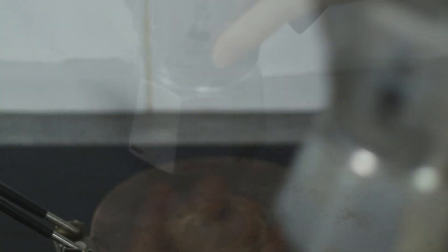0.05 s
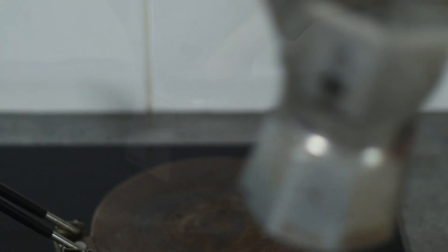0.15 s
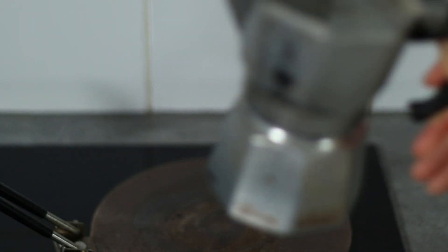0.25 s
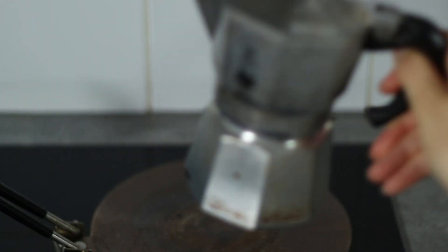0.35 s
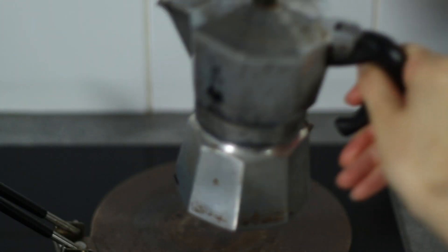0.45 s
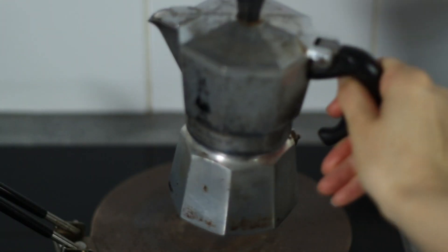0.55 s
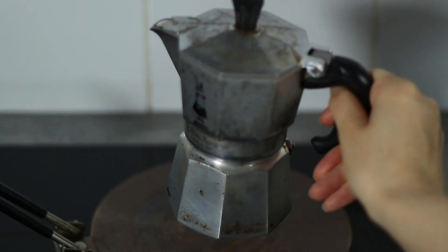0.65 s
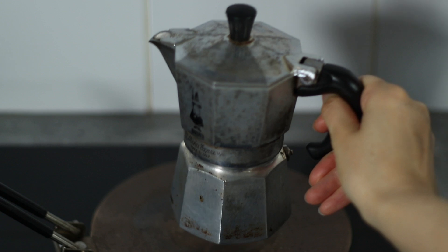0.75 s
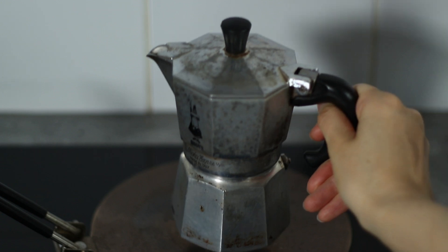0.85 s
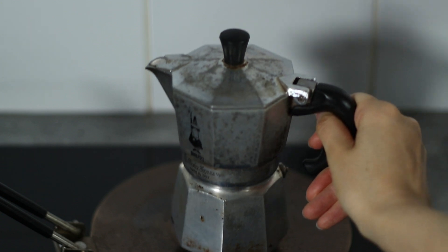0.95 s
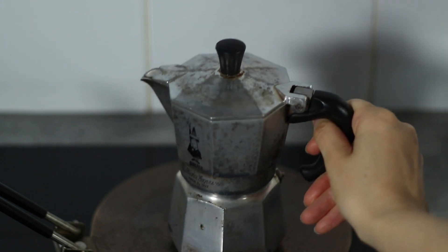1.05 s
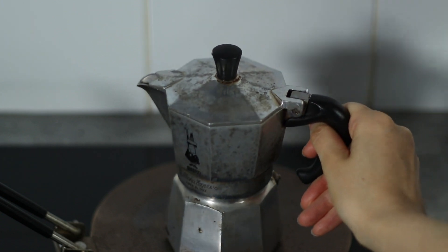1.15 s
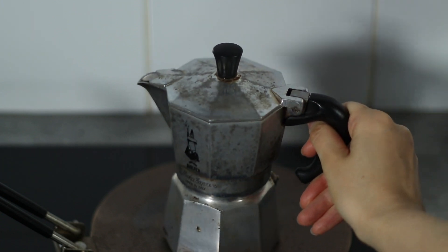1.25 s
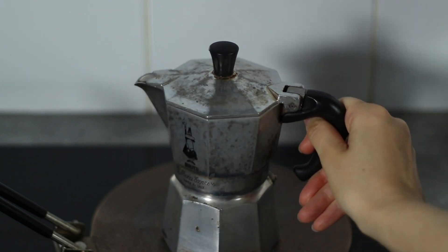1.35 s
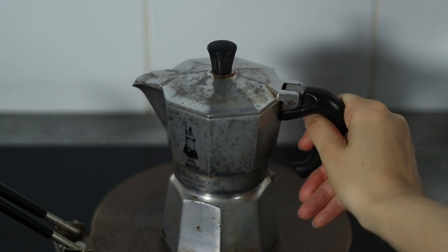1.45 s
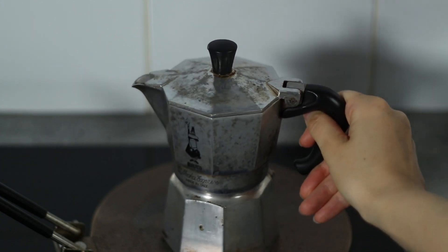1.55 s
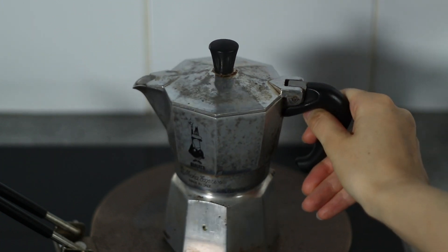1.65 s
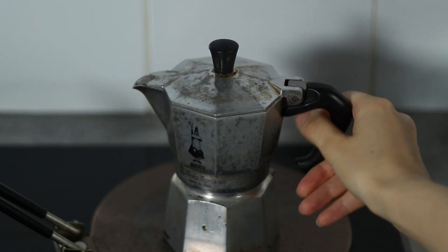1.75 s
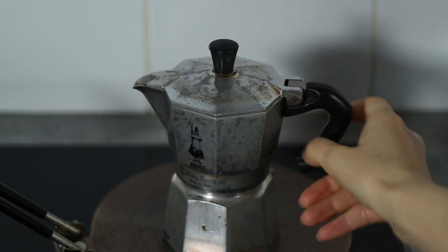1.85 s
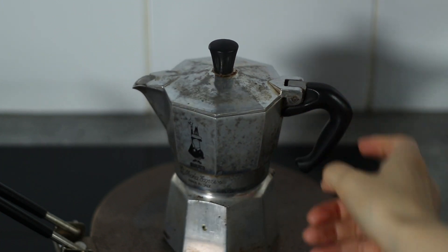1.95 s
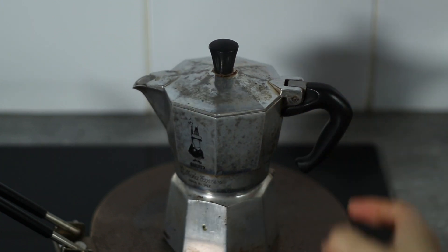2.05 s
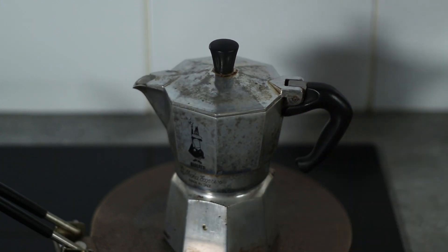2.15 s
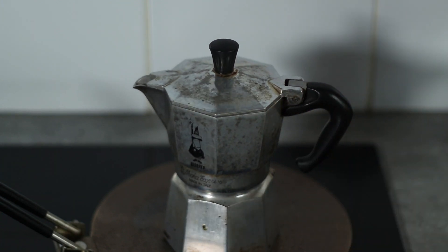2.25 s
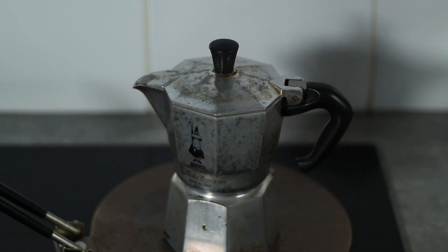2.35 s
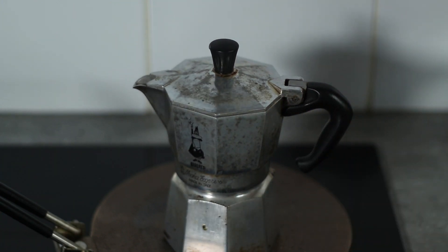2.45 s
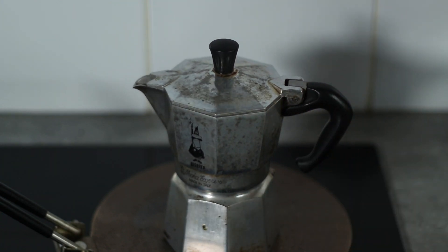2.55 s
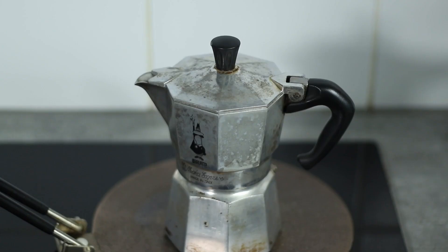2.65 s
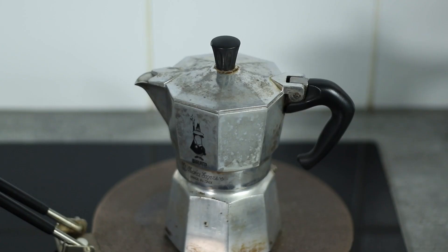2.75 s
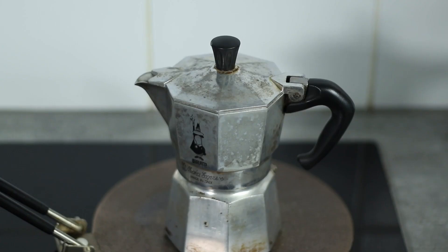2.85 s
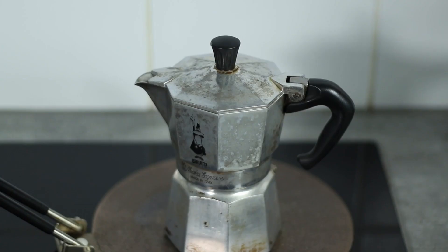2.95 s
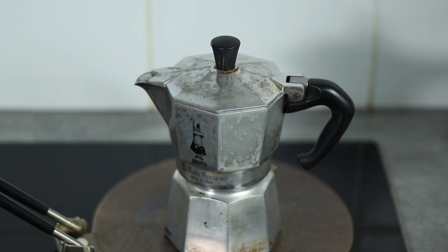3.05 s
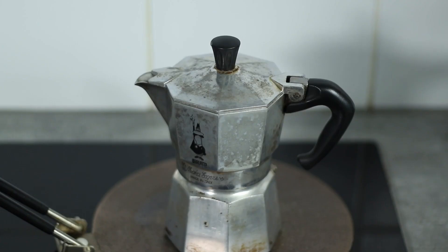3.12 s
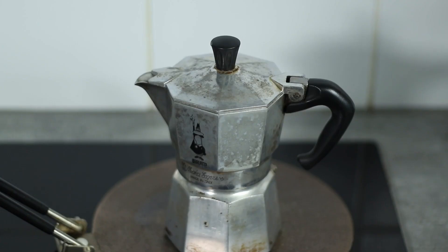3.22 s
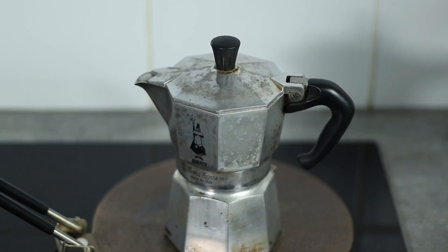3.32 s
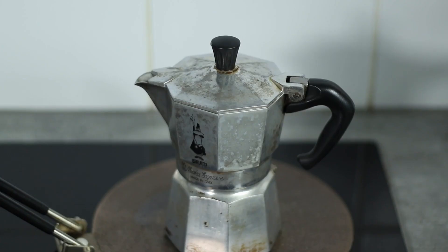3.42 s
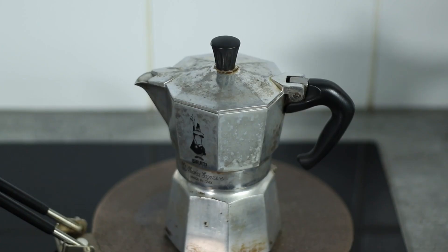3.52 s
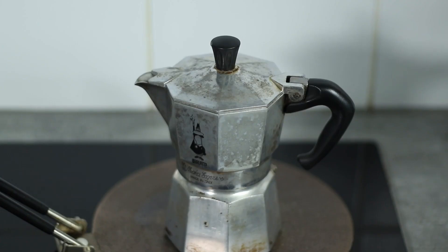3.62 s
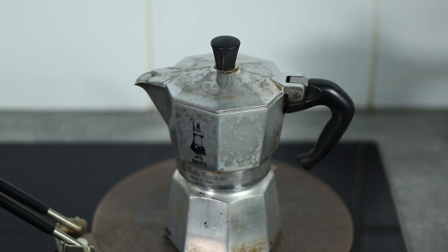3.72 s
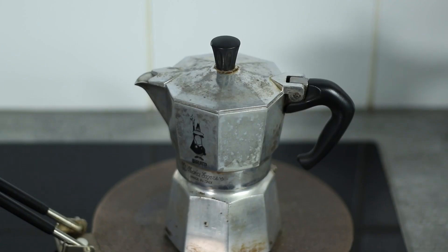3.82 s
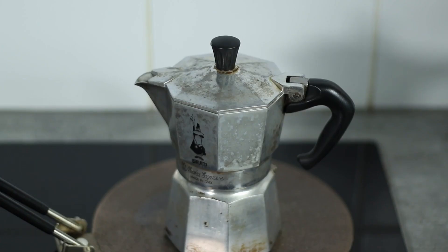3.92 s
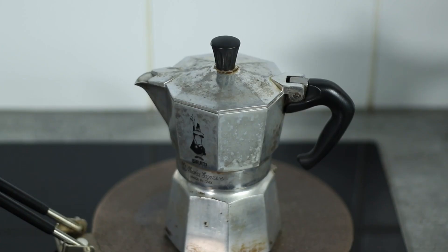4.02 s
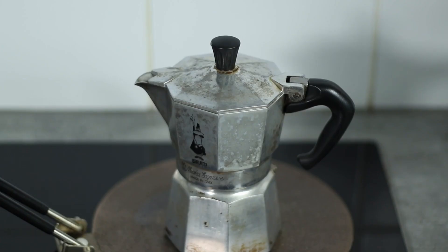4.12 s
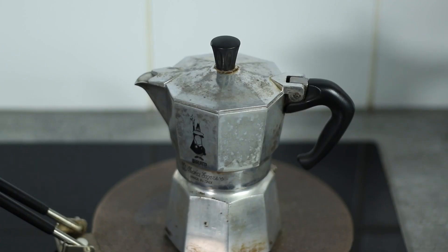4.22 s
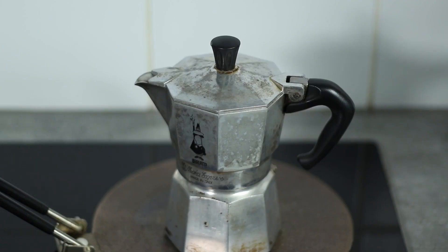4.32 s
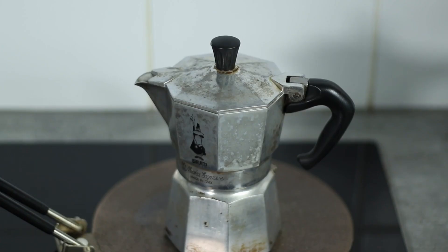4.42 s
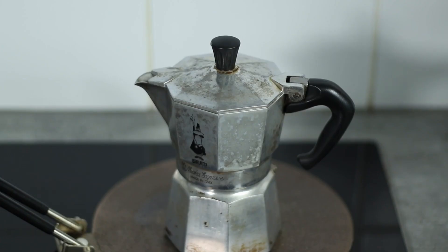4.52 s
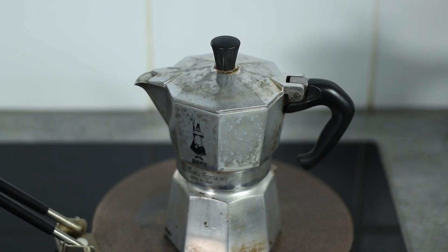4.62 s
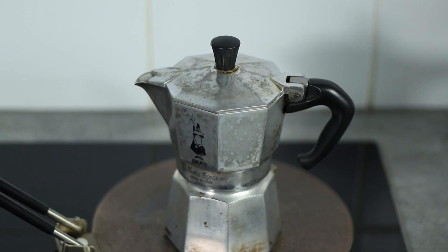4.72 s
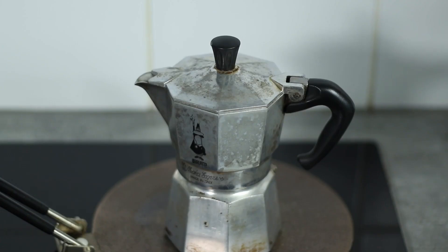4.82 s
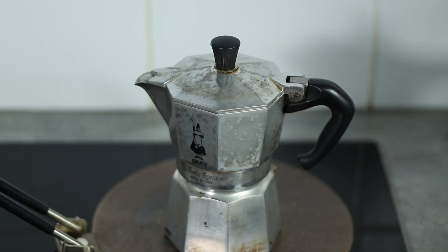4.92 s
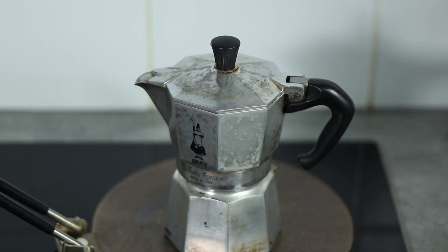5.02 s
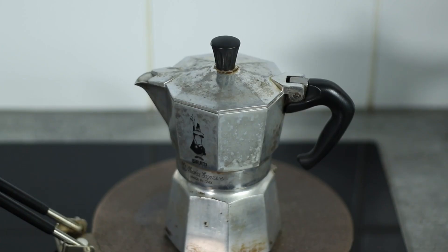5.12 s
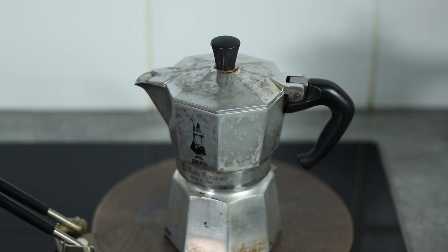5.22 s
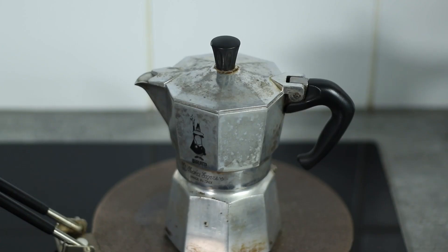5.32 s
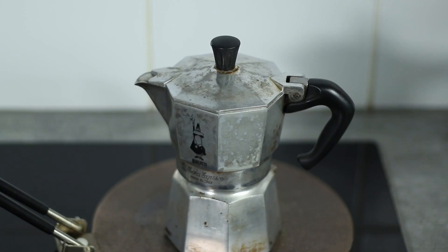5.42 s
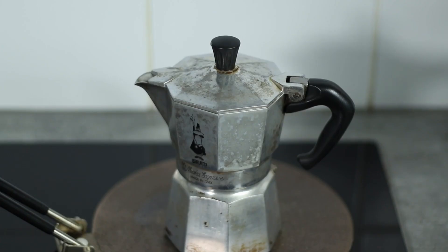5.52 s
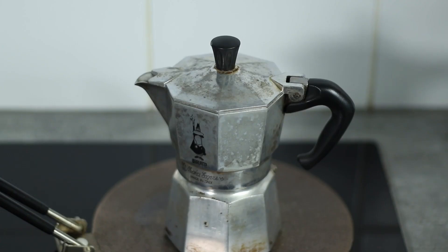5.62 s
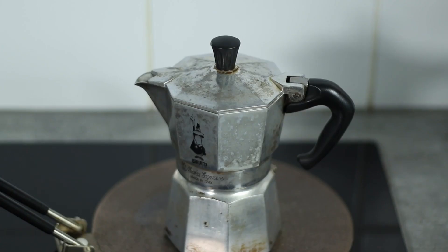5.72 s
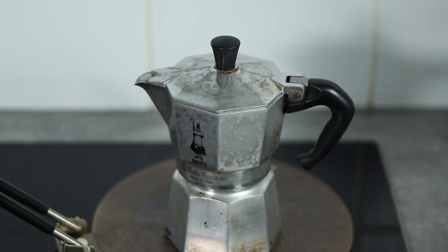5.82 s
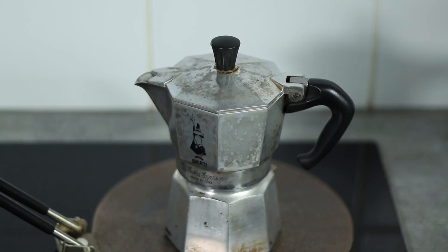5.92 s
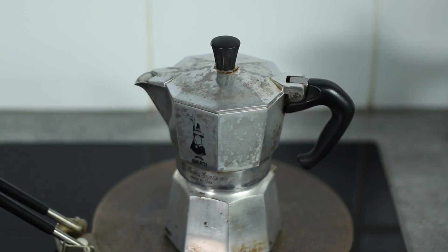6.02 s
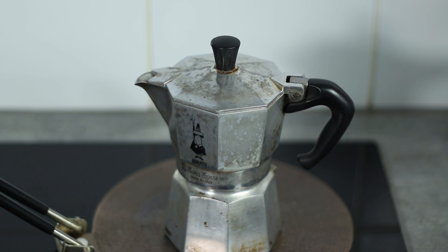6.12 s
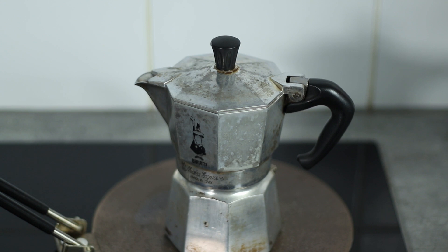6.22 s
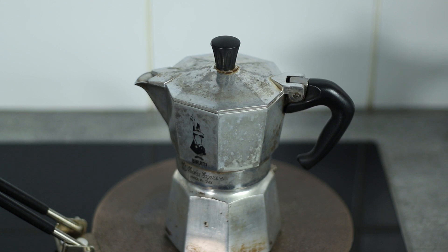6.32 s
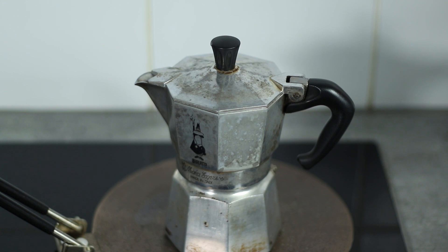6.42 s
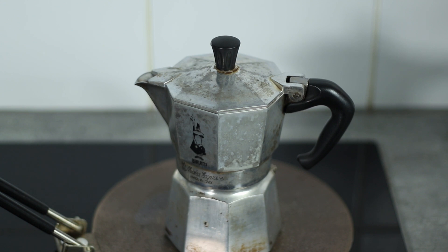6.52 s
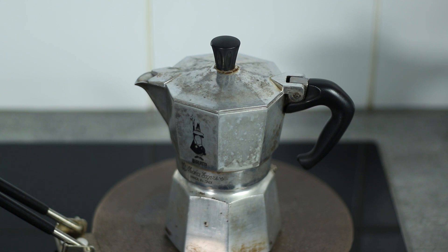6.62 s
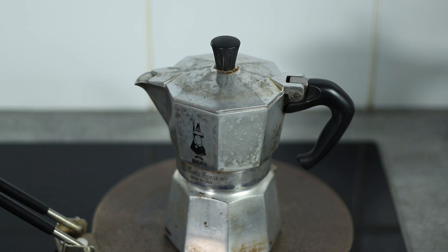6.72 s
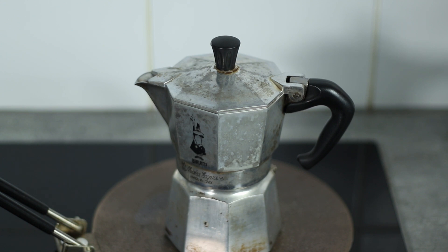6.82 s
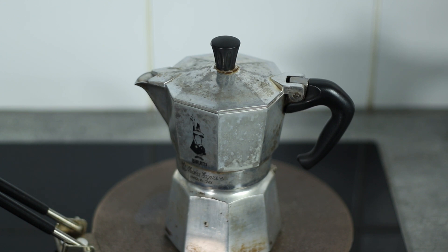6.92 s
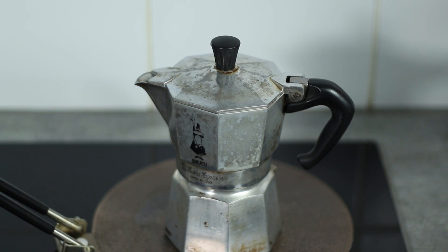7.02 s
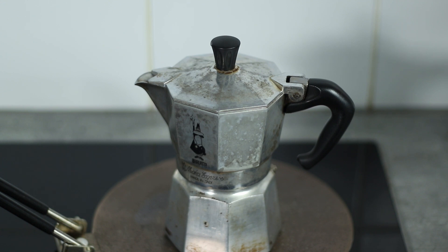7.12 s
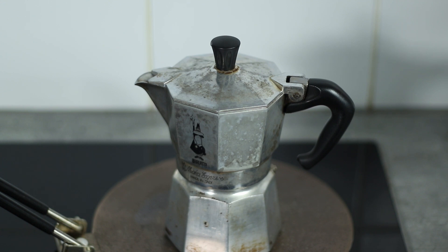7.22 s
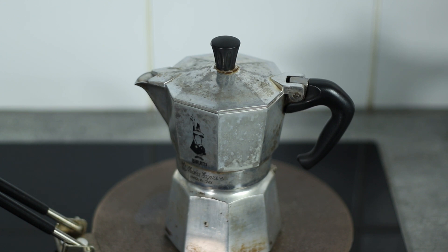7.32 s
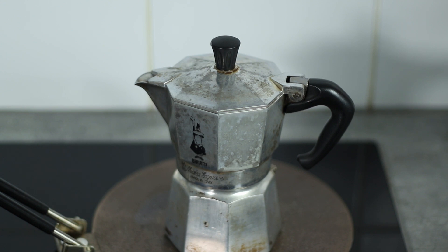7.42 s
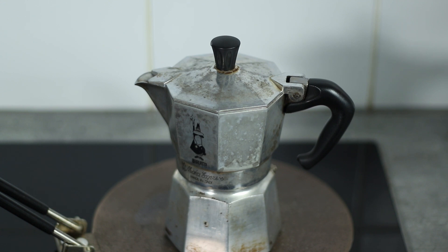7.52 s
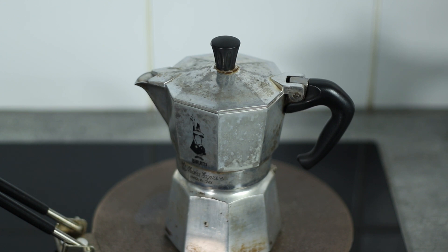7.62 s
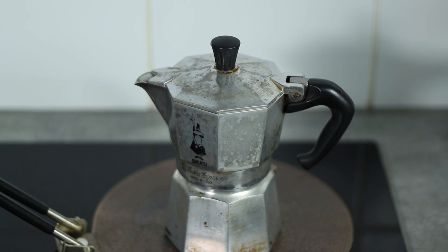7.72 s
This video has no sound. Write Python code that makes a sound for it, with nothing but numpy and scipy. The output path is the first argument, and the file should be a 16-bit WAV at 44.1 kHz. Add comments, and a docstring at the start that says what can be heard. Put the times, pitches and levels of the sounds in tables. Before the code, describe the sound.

A metal pot clanks down onto a steel plate in a quiet kitchen, then an abrupt cut to sizzling, spitting water, relay clicks, hum and fan.

```python
"""Coffee pot on a glass hob

In a quiet kitchen a metal pot lands on a steel plate over a glass hob, rocks and slides: ringing modes, thumps
and gritty noise. After a cut the hob runs. Trapped water sizzles, spits and whistles, made of hiss, noise bursts
and noise-widened tones. Relays click as ringing modes with noise, the coil hums on two sines,
and the fan whirs with shaft tones over air noise.
"""
import sys
import numpy as np
from scipy import signal
from scipy.fft import rfft, irfft, next_fast_len
from scipy.io import wavfile
from scipy.ndimage import uniform_filter1d, map_coordinates

SR = 44100
rng = np.random.default_rng(int(sys.argv[2]) if len(sys.argv) > 2 else 0)


def to_wav(s):
    """Save 16-bit WAV."""
    ch = np.atleast_2d(s).T  # columns
    pcm = np.round(np.clip(ch, -1, 1) * 32767)  # PCM
    wavfile.write(sys.argv[1], SR, pcm.astype(np.int16))


N = 342216
T = np.arange(N) / SR  # seconds

# Levels and spectra below are relative: each source sets its own gain.
# Contacts of pot and plate. Each row: start in seconds, metal level in dB, thump level in dB.
BLOWS = [(1.2663, -8.5, -9), (1.3, -36, -27), (1.456, -31.5, -18.5), (1.480, -68, -18.5), (1.535, -59, -32),
         (1.611, -70, -37.5), (1.824, -59, -34), (1.844, -70, -32.5), (1.869, -80, -38.5)]
# Ringing modes of pot and plate. Each row: frequency in Hz, level in dB, t60 in seconds.
POT_MODES = [(626, -8.5, 0.18), (734, -7, 0.28), (820, -7.5, 0.11), (1150, -7, 0.05), (1212, -8.5, 0.26),
             (1377, -17, 0.53), (1567, -2, 0.099), (1707, -18, 0.321), (2047, -5.5, 0.046),
             (2300, -13.5, 0.19), (2720, -13, 0.33), (2740, -13.5, 0.17), (3040, -17, 0.093),
             (3176, -22.5, 0.31), (3580, -21.5, 0.2), (3865, -18.5, 0.244), (3750, -20, 0.17),
             (4440, -14.5, 0.1), (4409, -13.5, 0.04), (5060, -25.5, 0.2), (9534, -45.5, 0.25)]
# Modes of the worktop below. Each row: frequency in Hz, level in dB, t60 in seconds.
WORKTOP_MODES = [(61.2, -4, 0.25), (110, 8.5, 0.055), (131, 0, 0.27), (170, 4, 0.1), (227.7, -8, 0.053),
                 (292, -12, .12), (364, -7, 0.12), (469, -17.5, 0.21), (682, -12, .1)]
# Broad clatter of the plate. Each row: frequency in Hz, density in dB per Hz.
CLANK_SPECTRUM = [(180, -32.5), (300, -8), (377, -3.5), (467, -15.5), (788, -7), (1820, -20.5),
                  (2730, -8.5), (3270, -30.5), (4120, -14.5), (5180, -33.5), (5710, -29.5), (15000, -71)]
# The pot sliding. Each row: time in seconds, level in dB.
SLIDE = [(1.457, -59), (1.58, -63), (1.7, -61), (1.745, -69)]
# Colour of the sliding. Each row: frequency in Hz, density in dB per Hz.
RUBBING_SPECTRUM = [(200, -24), (400, 2.5), (1000, -11), (2500, -13), (3300, -14.5), (4200, -12.5),
                    (4900, -20.5), (5300, -24), (5900, -26), (6600, -26), (7600, -26), (8300, -29),
                    (8900, -34.5), (12000, -46)]
# A sleeve rustling. Each row: time in seconds, level in dB.
RUSTLE = [(2.38, -87), (2.436, -75), (2.64, -83.5), (2.66, -96)]
# Colour of the sleeve. Each row: frequency in Hz, density in dB per Hz.
CLOTH_SPECTRUM = [(1500, -30), (4000, 2), (8000, 3), (15000, -10.5)]
# Ticks of the handle. Each row: start in seconds, level in dB, centre in Hz.
HANDLE_TICKS = [(0.9898, -45.5, 4450), (2.031, -42.5, 5800)]
# Sizzle under the pot. Each row: time in seconds, level in dB, crackle share in dB, top hiss level in dB.
SIZZLE = [(2.69, -37, -1, -63), (2.85, -49.5, 5.5, -59), (3.5, -53, 5.5, -60), (3.8, -56, -6, -59.5),
          (3.96, -62.5, -3, -65), (4.01, -79, 6, -78), (4.1, -65.5, 6.5, -69), (4.2, -85, 13, -71.5),
          (4.75, -65.5, -2, -68.5), (5.4, -55.5, -12, -57.5), (5.87, -59, -17, -57), (5.92, -52, -2, -53),
          (7.45, -51, -0.5, -53), (7.53, -64.5, 2, -63.5), (7.63, -64, 6.5, -60), (7.69, -53, 0, -54.5),
          (7.76, -58.5, -4, -67)]
# Main body of the steam hiss. Each row: frequency in Hz, density in dB per Hz.
STEAM_SPECTRUM = [(240, -39), (400, 3.5), (512, 0), (626, 1.5), (742, -1.5), (906, -8), (1330, -3),
                  (1900, -10), (2050, -7.5), (4180, -4.5), (7400, -1.5), (15000, -20.5), (16000, -15)]
# Tiny crackling bursts. Each row: frequency in Hz, density in dB per Hz.
CRACKLE_SPECTRUM = [(1000, -52), (2500, -5), (4500, -11), (6800, 2), (8500, -0.5), (11000, -22),
                    (16000, -20)]
# Fine top of the hiss. Each row: frequency in Hz, density in dB per Hz.
JET_SPECTRUM = [(5590, -19), (9500, 0), (11100, -1.5), (12400, -3.5), (15000, 2.5), (15700, -4),
                (16000, -13)]
# Drops bursting at set times, most of them loud. Each row: start in seconds, level in dB,
# low body relative to the snap in dB.
SET_SPITS = [(2.6959, -12.5, -6.5), (2.7152, -24.5, 7), (2.7245, -14.5, -5), (2.7377, -19, -5),
             (2.7731, -19, -20), (2.7892, -16.5, -8), (2.798, -21, -20), (2.851, -23, -4),
             (2.8899, -21, -8), (2.9038, -30, -18), (2.9234, -14, 0), (2.9487, -14.5, -15),
             (2.9961, -14, -4.5), (3.029, -16, -7), (3.0371, -13, -15), (3.0788, -27, 6),
             (3.1113, -25, -13), (3.1504, -10.5, -10), (3.1573, -16.5, -7.5), (3.2246, -23, -18),
             (3.254, -14, -12.5), (3.2733, -19, -22), (3.3113, -13.5, -10), (3.3474, -17.5, -13),
             (3.4245, -15.5, -8.5), (3.473, -26, -21), (3.5783, -13.5, -3.5), (6.0547, -21, -7),
             (6.5195, -25, -20)]
# Separate puffs of escaping steam. Each row: time in seconds, level in dB.
PUTTER = [(3.9, -70), (3.96, -55), (4.02, -65.5), (4.9, -65.5), (5.4, -73.5), (7.45, -76), (7.52, -61),
          (7.76, -62.5)]
# Colour of the puffs. Each row: frequency in Hz, density in dB per Hz.
PUFF_SPECTRUM = [(3000, -33), (5000, -19), (9000, -8), (12000, -5), (15000, -1)]
# Bands of the steam whistle. Each row: pitch ratio, level in dB.
WHISTLE_BANDS = [(1, 0), (.88, -3), (.6, -7), (1.13, -9)]
# Plate resonances that colour hiss and scraping. Each row: frequency in Hz, width in Hz, lift in dB.
PLATE_PEAKS = [(4800, 400, 4), (5950, 400, 4), (7600, 400, 2), (8800, 450, 4), (10050, 400, 4),
               (11400, 400, 3), (13300, 500, 2), (14700, 400, 3)]
# Relay clicks. Each row: start in seconds, level in dB.
RELAY_CLICKS = [(2.9146, -17), (3.4111, -23.5), (4.4107, -18), (4.9142, -21), (7.7514, -30.5)]
# Modes of the relay armature. Each row: frequency in Hz, level in dB, t60 in seconds.
ARMATURE_MODES = [(2994, -9.5, 0.02), (4250, 12.5, 0.0053), (4590, -4, 0.024), (7000, -15, 0.022),
                  (9030, -9, 0.022), (11200, -20, 0.044), (14900, -3, 0.02)]
# Spans of coil hum. Each row: on in seconds, off in seconds, first level in dB, settled level in dB,
# settling time constant in seconds.
COIL_ON = [(2.693, 2.95, -29, -40.5, 0.088), (4.91, 7.759, -44, -35.5, 0.19)]
# Fan tones from seven blades and the motor poles. Each row: multiple of the shaft speed, level in dB.
FAN_TONES = [(7, -54.5), (14, -60.5), (16, -74.5), (20, -66), (21, -67), (24, -79), (28, -70), (36, -61),
             (40, -59.5)]
# Fan air noise. Each row: frequency in Hz, density in dB per Hz.
FAN_AIR_SPECTRUM = [(12, -27), (20, 0.5), (54, -9), (120, 4), (210, -11.5), (245, -2.5), (278, -7.5),
                    (324, -2), (419, -16), (514, -14), (664, -17), (1080, -24), (1430, -21.5), (1890, -25),
                    (9000, -40), (11700, -73), (19800, -120)]
# Distant traffic and air. Each row: frequency in Hz, density in dB per Hz.
KITCHEN_SPECTRUM = [(12, -27.5), (20, -7.5), (39, -3.5), (60, -24), (116, -0.5), (210, -15.5), (248, -16),
                    (388, -27), (434, -22.5), (542, -31.5), (607, -29.5), (1190, -31.5), (1860, -29.5),
                    (3440, -38), (16000, -57)]
# Fuzzy tones in the kitchen air. Each row: frequency in Hz, width in Hz, lift in dB.
WHINE_PEAKS = [(1478, 90, 6.5), (1860, 37, 6.5), (2050, 120, 1.5)]
# Decay of the room. Each row: frequency in Hz, t60 in seconds.
WALLS = [(100, 0.54), (1000, 0.37), (4000, 0.29), (12000, 0.11)]

CUT_S = 2.687  # the running hob starts here
SPIT_HZ, SPIT_SCATTER = 6270, 0.035  # centre of a snap, relative spread from drop to drop
SMALL_PER_S, SMALL_DB, DRY_S = 55, -26.5, 3.62  # small drops: rate, loudest setting, puddle gone
PUFFS_PER_S = 90  # before the rate wobbles
WHISTLE_S, WHISTLE_HZ = (4.95, 5.92), (5700, 10250)  # start and end; lowest and highest main pitch
WHISTLE_DB, SWELL_DB = -65, 6.5  # base level, gain as it climbs
CLIMB_MID_S, CLIMB_S = 5.33, .135  # middle and time scale of the climb
COIL_HUM_HZ, SHAFT_HZ = 100, 36.39  # twice the mains frequency; fan turns per second
QUIET_DB = -59.5  # kitchen air before its fuzzy tones are lifted
CLIP, TOP_HZ = .5, 16000  # input ceiling as amplitude, band limit


def amp(db):
    """Turns dB into gain."""
    return 10 ** (np.asarray(db) / 20)


def unit(x):
    """Scales a sound to rms 1."""
    return x / np.sqrt(np.mean(x ** 2) + 1e-20)


def along(points, hz):
    """Reads a curve of (Hz, value) points on a log frequency axis."""
    f, v = np.transpose(points)
    return np.interp(np.log(hz + 1), np.log(f + 1), v)


def span(start, end, smooth):
    """A gate open between two times, its edges smoothed over a number of samples."""
    return uniform_filter1d(1. * (T > start) * (T < end), size=smooth)


def curves(rows):
    """A gate open over the rows' span, then one automation curve for each column."""
    s, *cols = np.transpose(rows)
    gate = uniform_filter1d(1. * (T > s[0]) * (T <= s[-1] + .01), size=200)
    return [gate] + [np.interp(T, s, c) for c in cols]


def wobble(rate):
    """A smooth random curve with rate knots a second."""
    knots = rng.standard_normal(int(N * rate / SR) + 4)
    return map_coordinates(knots, [T * rate])


def filtered(x, response):
    """Shapes x with a gain that is a function of frequency."""
    m = next_fast_len(N + SR // 2)
    return irfft(rfft(x, m) * response(np.fft.rfftfreq(m, 1 / SR)), m)[:N]


def coloured(spectrum, x=None):
    """Gives noise, or x, a spectrum at rms 1."""
    x = rng.standard_normal(N) if x is None else x
    return unit(filtered(x, lambda hz: amp(along(spectrum, hz))))


def lifted(x, peaks):
    """Lifts bands around resonances."""
    def response(f):
        return amp(sum(db / (1 + (2 * (f - hz) / width) ** 2) for hz, width, db in peaks))
    return filtered(x, response)


def band(x, hz, octaves):
    """A causal band-pass around hz."""
    edges = np.clip(hz * 2. ** np.array([-octaves / 2, octaves / 2]), 30, SR * .45)
    return signal.sosfilt(signal.butter(N=2, Wn=edges, btype="band", fs=SR, output="sos"), x)


def puff(t60, size=SR // 2):
    """A dying burst of noise."""
    return amp(-60 * T[:size] / t60) * rng.standard_normal(size)


def bursts(starts, length):
    """Noise gated by a short exponential decay after each start; length is its time constant in seconds."""
    envelope = signal.lfilter([1], [1, -np.exp(-1 / (length * SR))], starts)
    return envelope * rng.standard_normal(N)


def random_starts(per_s, spread_db, most):
    """Impulses at random times, with randomly raised strengths."""
    hits = rng.random(N) < per_s / SR
    return hits * amp(spread_db * rng.exponential(size=N).clip(0, most))


def ring(modes, scatter_db, attack, rough):
    """One blow on decaying modes of varied strength; a wavering pitch blurs each into a cluster."""
    hz, db, t60 = np.transpose(modes)[..., None]
    t = T[:round(min(t60.max(), .3) * SR)]
    waver = rng.standard_normal((len(modes), len(t)))
    waver = unit(uniform_filter1d(uniform_filter1d(waver, size=120), size=120))
    phase = 2 * np.pi * np.cumsum(hz * (1 + rough * waver), axis=1) / SR
    db = db + scatter_db * rng.standard_normal(db.shape)
    return (1 - np.exp(-t / attack)) * np.sum(amp(db - 60 * t / t60) * np.sin(phase), axis=0)


def add(track, s, sound):
    """Mixes a sound in at s seconds."""
    part = track[round(s * SR):][:len(sound)]
    part += sound[:len(part)]


def set_down():
    """Each contact rings and clacks the metal and thumps the worktop below."""
    out, clatter, t = np.zeros(N), np.zeros(N), T[:SR // 2]
    rise = 1 - np.exp(-t / 0.0013)
    for s, db, thump_db in BLOWS:
        add(out, s, amp(db - 9) * ring(POT_MODES, scatter_db=2, attack=.0015, rough=.045))
        add(out, s, amp(db - 20) * rise * band(puff(0.058), 5300, octaves=0.74))
        add(out, s, amp(thump_db - 3) * ring(WORKTOP_MODES, scatter_db=1.5, attack=.003, rough=.12))
        quick = amp(db + 3.5 - 60 * t / 0.029)
        lingering = amp(db - 20.5 - 60 * t / 0.37)
        add(clatter, s, rise * (quick + lingering))
    return out + clatter * amp(1.3 * wobble(150)) * coloured(CLANK_SPECTRUM)


def handling():
    """Sliding is noise roughened by tiny grit bursts; a sleeve hisses and the handle ticks twice."""
    gate, db = curves(SLIDE)
    grit = bursts(random_starts(900, spread_db=4, most=2.5), .0007)
    rubbing = coloured(RUBBING_SPECTRUM, rng.standard_normal(N) + 0.54 * unit(grit))
    out = gate * amp(db + 5.5 + 0.92 * wobble(40)) * plate(rubbing)
    gate, db = curves(RUSTLE)
    out += gate * amp(db + 1.2 * wobble(80)) * coloured(CLOTH_SPECTRUM)
    for s, db, hz in HANDLE_TICKS:
        add(out, s, amp(db - 4) * band(puff(.015), hz, octaves=1.5))
        add(out, s, amp(db - 11.5) * band(puff(0.17), hz, octaves=1.1))
    return out


def sizzle():
    """Fluttering steam hiss with a dense crackle of tiny bursts."""
    gate, db, crackle_db, top_db = curves(SIZZLE)
    flutter = 0.76 * wobble(25) + 1.4 * wobble(90) + 0.53 * wobble(5)  # dB
    pops = bursts(random_starts(600, spread_db=5.5, most=2.8), .0006)
    hiss = amp(flutter) * coloured(STEAM_SPECTRUM)
    crackle = amp(crackle_db + 1.5 * wobble(12)) * coloured(CRACKLE_SPECTRUM, pops)
    top = amp(top_db + 0.92 * flutter) * coloured(JET_SPECTRUM)
    return gate * (amp(db) * (hiss + crackle) + top)


def spits():
    """Each drop bursts with a snap, a sputtering tail and a duller body; small ones have random timing."""
    out = np.zeros(N)
    draw = rng.random((60, 3))  # timing, level and body of each small drop
    times = CUT_S + (np.arange(len(draw)) + draw[:, 0]) / SMALL_PER_S
    small = [(s, SMALL_DB - 9 * a, -14 * b) for s, (_, a, b) in zip(times, draw) if s < DRY_S]
    for s, db, body_db in list(SET_SPITS) + small:
        hz = SPIT_HZ * (1 + SPIT_SCATTER * rng.standard_normal())
        click = 4 * (T[:1200] == 0)
        tail = amp(-12) * puff(0.029, size=1200)
        snap = band(click + puff(0.0034, size=1200) + tail, hz, octaves=0.6)
        body = band(puff(0.027, size=1200), 1800, octaves=2.86)
        drop = snap / np.abs(snap).max() + amp(body_db) * body / np.abs(body).max()
        add(out, s, amp(db - 7.5) * drop)
    return out


def putter():
    """Steam leaves the gap in quick, uneven puffs when little water is left."""
    gate, db = curves(PUTTER)
    count = np.floor(np.cumsum(PUFFS_PER_S * amp(1.9 * wobble(70))) / SR)
    starts = np.diff(count, prepend=0) * amp(2.5 * wobble(120))
    return gate * amp(db) * coloured(PUFF_SPECTRUM, bursts(starts, .0008))


def whistle():
    """A breathy steam whistle climbs and swells as the gap narrows."""
    out = np.zeros(N)
    narrow = 1 / (1 + np.exp(-(T - CLIMB_MID_S) / CLIMB_S))  # 0 to 1
    hz = WHISTLE_HZ[0] + (WHISTLE_HZ[1] - WHISTLE_HZ[0]) * narrow
    phase = 2 * np.pi * np.cumsum(hz) / SR
    gate = span(*WHISTLE_S, smooth=3000)
    for ratio, band_db in WHISTLE_BANDS:
        # noise as a modulator widens the tone to a band
        breathy = unit(wobble(560)) * amp(1.5 * wobble(14))
        out += gate * amp(WHISTLE_DB + SWELL_DB * narrow + band_db) * breathy * np.sin(ratio * phase)
    return out


def relays():
    """The armature snaps over and rings; the contact bounces once and the casing rattles."""
    out = np.zeros(N)
    for s, db in RELAY_CLICKS:
        add(out, s, amp(db - 6) * ring(ARMATURE_MODES, scatter_db=1.5, attack=.0008, rough=.015))
        add(out, s, amp(db - 10.5) * band(puff(0.041), 4340, octaves=2.0))
        add(out, s, amp(db - 14.5) * band(puff(.02), 11000, octaves=1.2))
        add(out, s, amp(db - 24) * band(puff(0.35), 6000, octaves=3.1))  # casing
        bounce = ring(ARMATURE_MODES, scatter_db=1.5, attack=.0008, rough=.015)
        add(out, s + .004, amp(db - 15) * bounce)
    return out


def coil():
    """The field shakes the plate twice each mains cycle; the hum settles after each switch-on."""
    phase = 2 * np.pi * COIL_HUM_HZ * T
    level = np.zeros(N)
    for on, off, first_db, end_db, settle in COIL_ON:
        db = end_db + (first_db - end_db) * np.exp(-np.abs(T - on) / settle)
        level += span(on, off, smooth=600) * amp(db)
    hum = np.sin(phase) + amp(-19.5) * np.sin(2 * phase + 1.7)
    return level * amp(2.5 + 0.48 * wobble(12)) * hum


def fan():
    """Air noise and slightly unsteady tones at multiples of the shaft speed."""
    turn = 2 * np.pi * SHAFT_HZ * T + 0.0062 * wobble(5)
    out = amp(-44.5 + 0.57 * wobble(3.96)) * coloured(FAN_AIR_SPECTRUM)
    for k, db in FAN_TONES:
        out += amp(db + 1.5 + 1.7 * wobble(24)) * np.sin(k * turn + rng.uniform(0, 2 * np.pi))
    return out


def kitchen():
    """Distant traffic and air before the cut: coloured noise with narrow bands lifted into fuzzy tones."""
    air = lifted(coloured(KITCHEN_SPECTRUM), WHINE_PEAKS)
    return (T < CUT_S) * amp(QUIET_DB + 0.85 * wobble(5.3)) * air


def plate(x):
    """High resonances of the plate colour what hisses or scrapes on it."""
    return lifted(x, PLATE_PEAKS)


def room(x):
    """The kitchen's answer: a noise tail in which each frequency dies at its own speed."""
    hz, t, z = signal.stft(rng.standard_normal(SR // 2), SR, nperseg=256)
    decay = amp(-60 * t / along(WALLS, hz)[:, None])
    tail = signal.istft(z * decay, SR, nperseg=256)[1]
    delayed = np.pad(x, (150, 0))  # samples
    return signal.fftconvolve(delayed, tail / np.linalg.norm(tail))[:N]


def scene():
    """The pot in a quiet kitchen, then the running hob."""
    pot = set_down() + plate(handling())
    near = relays() + plate(sizzle() + spits() + putter() + whistle())
    before = pot + amp(-15.5) * room(pot)
    hob = fan() + coil() + near + amp(-13.5) * room(near)
    fade = np.clip((T - CUT_S) / 0.0037, 0, 1)
    return (kitchen() + before * (1 - fade) + fade * hob)[None]


def record(dry):
    """Peaks saturate the input at a firm ceiling; nothing is kept above the band limit."""
    hard = dry[0] / (1 + np.abs(dry[0] / CLIP) ** 16) ** (1 / 16)
    return filtered(hard, lambda hz: hz < TOP_HZ)[None]


dry = scene()
out = record(dry)
to_wav(out)
```